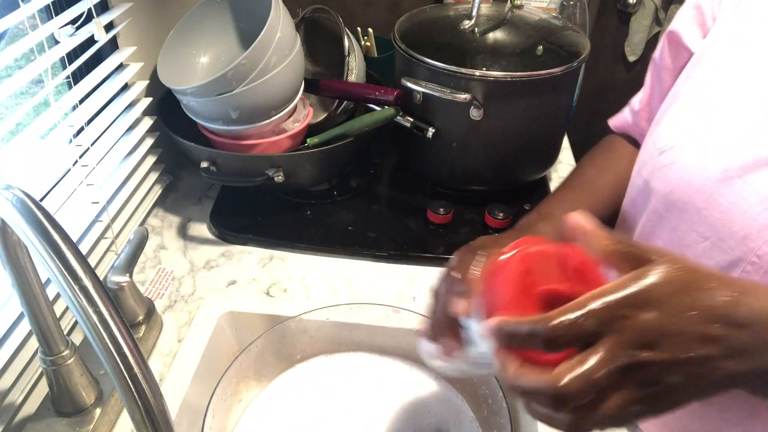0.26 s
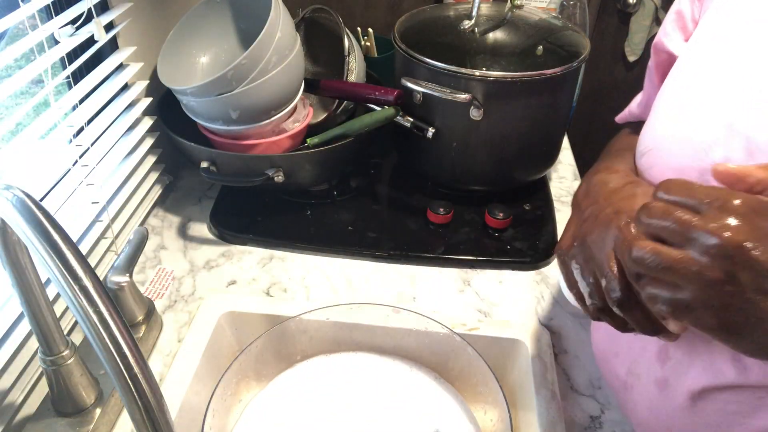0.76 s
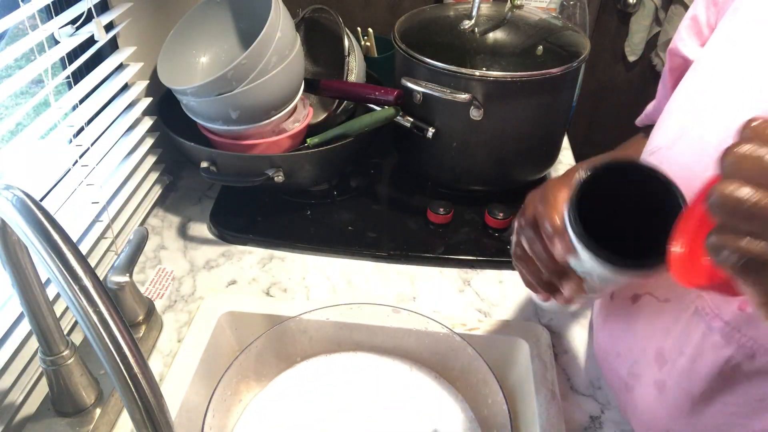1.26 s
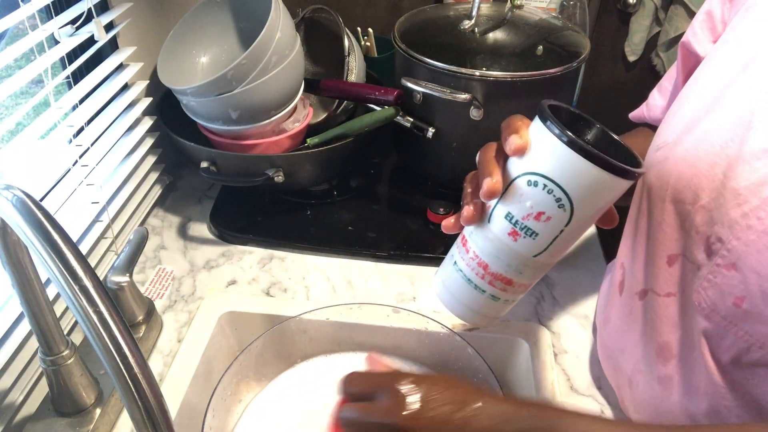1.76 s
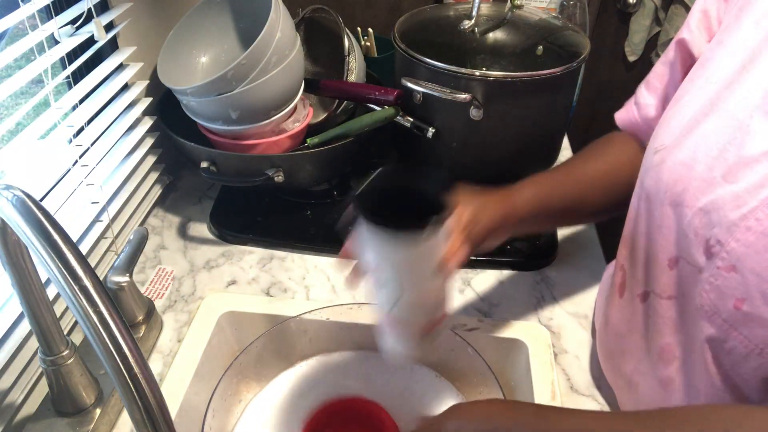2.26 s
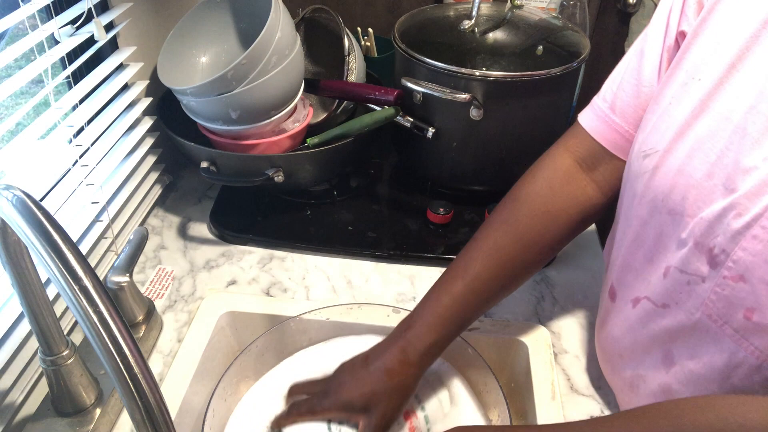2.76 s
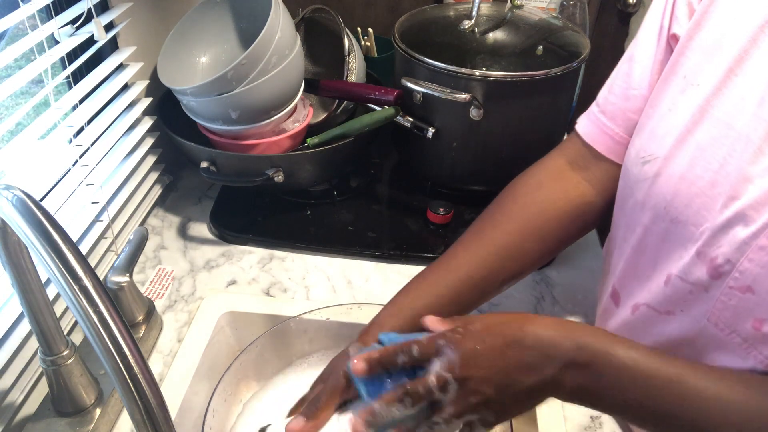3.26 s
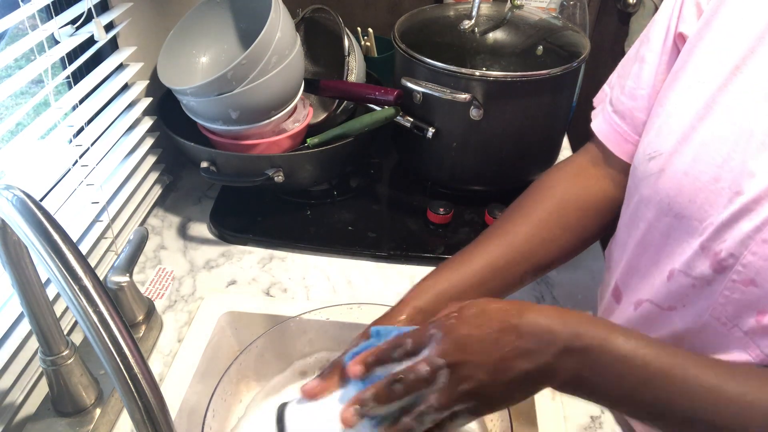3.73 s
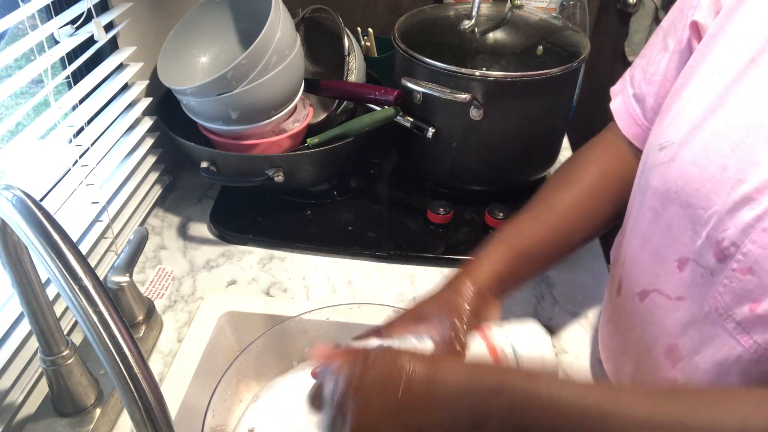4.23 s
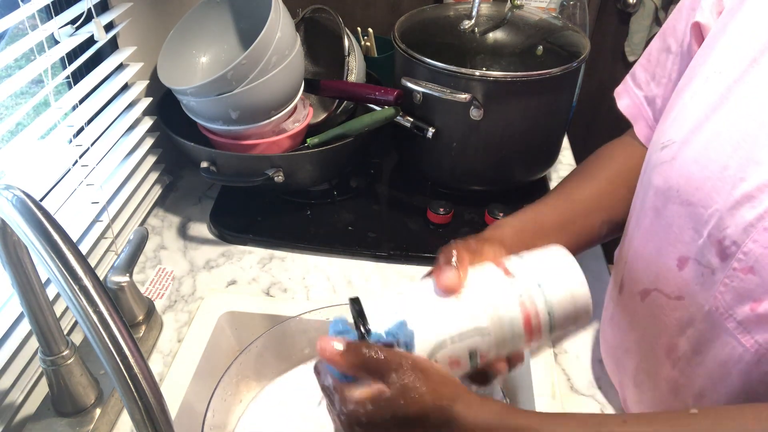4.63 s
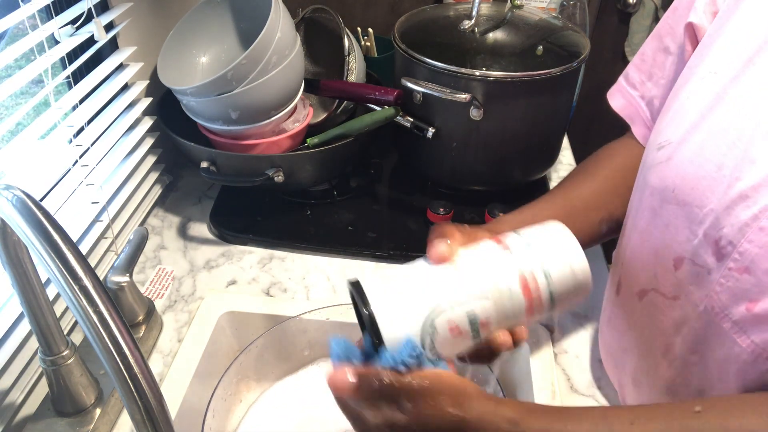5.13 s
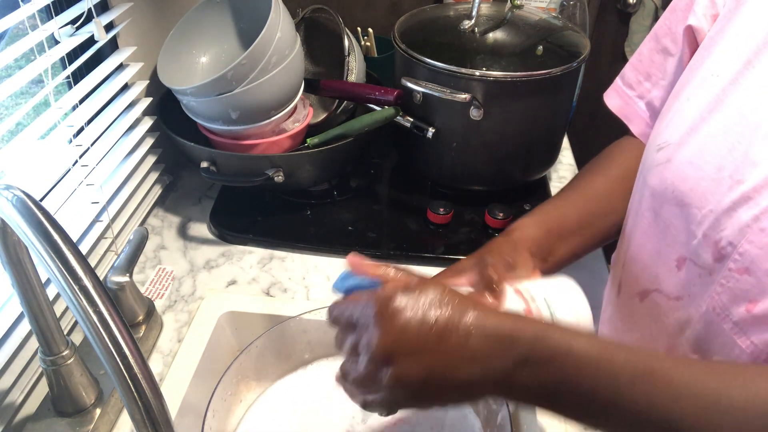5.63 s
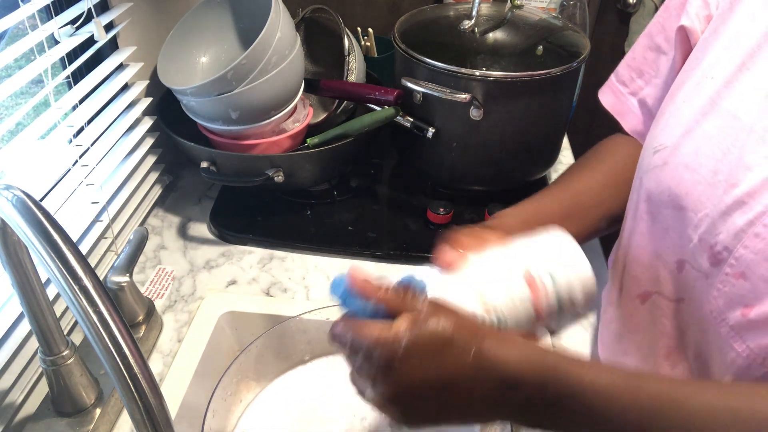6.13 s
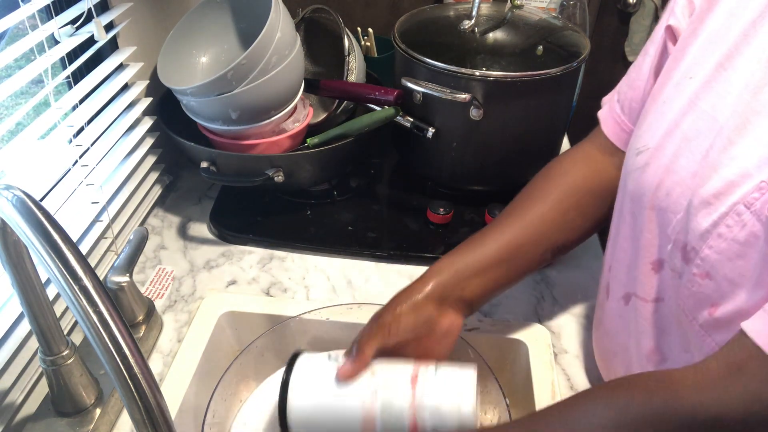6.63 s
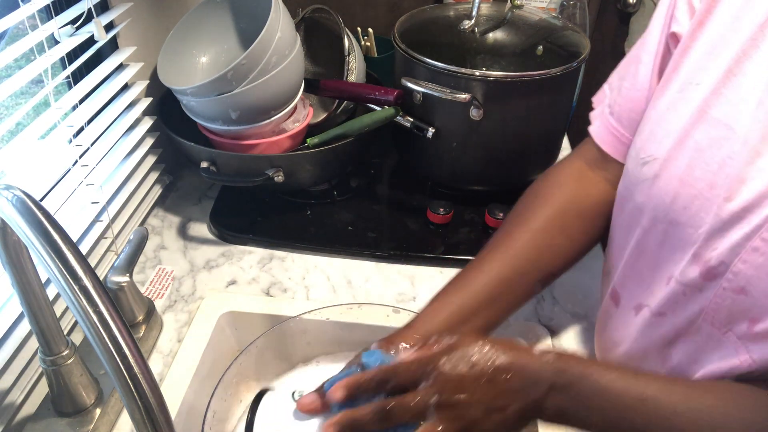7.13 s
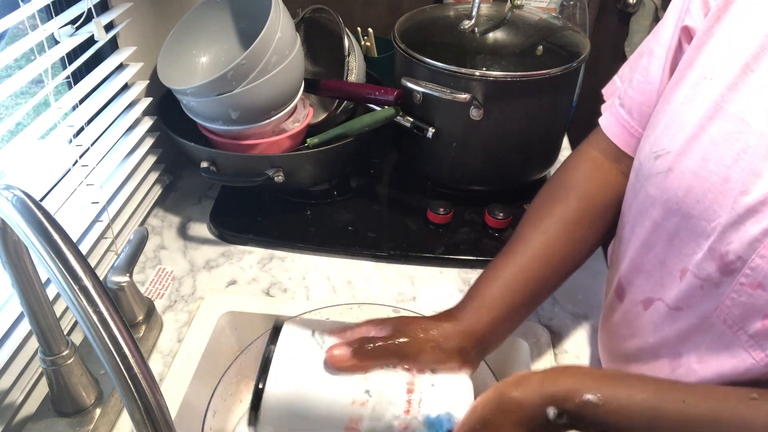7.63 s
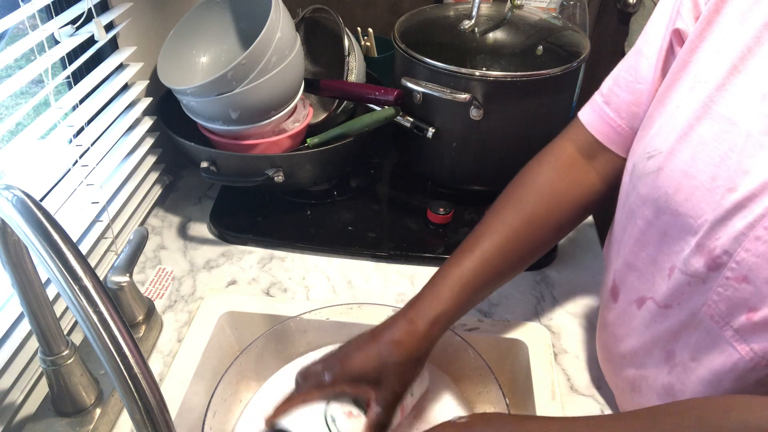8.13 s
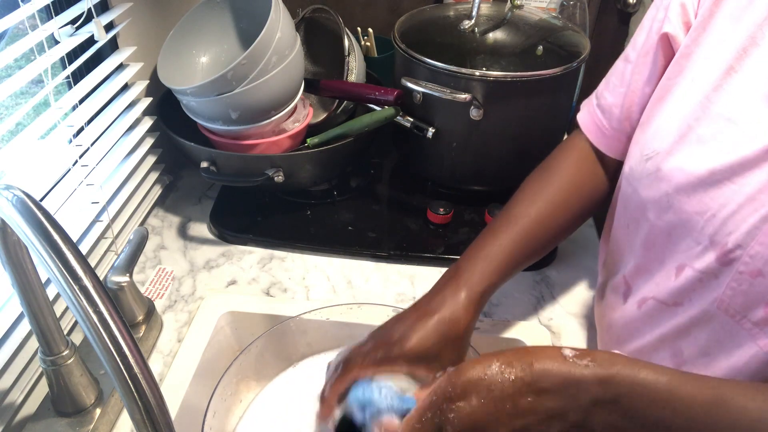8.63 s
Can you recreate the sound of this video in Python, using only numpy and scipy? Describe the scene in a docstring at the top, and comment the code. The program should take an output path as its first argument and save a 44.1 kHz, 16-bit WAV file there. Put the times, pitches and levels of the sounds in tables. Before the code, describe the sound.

A lid pops off a plastic tumbler, then hollow knocks and wet sponge squelches come from a sink over a steady appliance hum.

```python
"""A plastic tumbler washed by hand in a bowl of suds in a sink, close to a phone in a small kitchen.
Its lid pops off and sets the air inside ringing. It knocks and rolls against the bowl, the basin booms
underneath, and a sponge squelches among wet clacks and one squeak. Behind it an appliance hums and
blows throughout, a drone stops early on, and the microphone circuit picks up a faint, regular tick."""
import sys
import numpy as np
from scipy import signal
from scipy.fft import rfft, irfft
from scipy.io import wavfile
from scipy.ndimage import uniform_filter1d

SR = 44100
rng = np.random.default_rng(int(sys.argv[2]) if len(sys.argv) > 2 else 0)


def transcribe(signal):
    """Save signal, clipped to [-1, 1], as a 16-bit WAV file at the path in sys.argv[1]."""
    frames = np.atleast_2d(signal).T
    limited = np.clip(frames, -1, 1)
    pcm = np.round(limited * 32767).astype(np.int16)
    wavfile.write(sys.argv[1], SR, pcm)


N = 392038
T = np.arange(N) / SR


def amp(db):
    """Gain of a level in dB."""
    return 10 ** (np.asarray(db) / 20)


def unit(x):
    """Scaled to rms 1."""
    return x / np.sqrt(np.mean(x ** 2))


def band(x, hz, width_hz):
    """Resonant band-pass, gain 1 at the centre."""
    return signal.lfilter(*signal.iirpeak(min(hz, .45 * SR), hz / width_hz, fs=SR), x)


def wander(rate_hz):
    """Smooth random drift with a spread near 1."""
    hold = int(SR / rate_hz)
    steps = np.repeat(rng.standard_normal(N // hold + 1), hold)
    return 1.4 * uniform_filter1d(uniform_filter1d(steps, hold), hold)[:N]


def coloured_noise(points):
    """Noise of rms 1 whose spectrum follows (freq_hz, level_db) points."""
    hz, db = np.transpose(points)
    bins_hz = np.maximum(np.arange(N // 2 + 1) * SR / N, 1)
    gain = amp(np.interp(np.log(bins_hz), np.log(hz), db))
    return unit(irfft(rfft(rng.standard_normal(N)) * gain, N))


def decay(t, t60_s, rise_s):
    """Envelope that rises quickly and falls 60 dB in t60_s."""
    return np.exp(-np.log(1000) * t / t60_s) * (1 - np.exp(-t / rise_s))


def ring(hz, t60_s, rise_s):
    """One damped mode."""
    t = T[:SR // 3]
    return np.sin(2 * np.pi * hz * t) * decay(t, t60_s, rise_s)


def add(out, start_s, x):
    """Mix x into out from start_s."""
    i = int(start_s * SR)
    out[i:i + len(x)] += x[:N - i]


def swell(middle_s, length_s, db):
    """A smooth rise and fall around middle_s."""
    out = np.zeros(N)
    add(out, middle_s - length_s / 2, amp(db) * np.hanning(int(length_s * SR)))
    return out


# Noise floor of the phone's microphone: freq_hz, relative_db
HISS_SPECTRUM = [(2500, -5), (3200, -10.5), (4000, 0), (6300, -3.5), (8000, -6.5), (10000, -10),
                 (13000, -11.5), (16000, -12)]
def microphone_hiss(level_db=-78):
    """The microphone's own steady noise."""
    return amp(level_db) * coloured_noise(HISS_SPECTRUM)


# Colour of the tick, inside the phone: centre_hz, width_hz, peak_db
TICK_BANDS = [(2420, 420, -49), (4170, 1200, -53.5), (5600, 1300, -67.5)]
def electrical_ticks(first_s=.0522, period_s=.10241, offbeat_db=-8.5):
    """The microphone circuit picks up regular spikes of uneven size, with weaker ones halfway between."""
    spikes = np.zeros(N)
    at = (np.arange(first_s, N / SR, period_s / 2) * SR).astype(int)
    spikes[at] = amp(1.6 * rng.standard_normal(len(at)))
    spikes[at[1::2]] *= amp(offbeat_db)
    # a band's peak answer to a spike grows with its width, so divide that out
    return sum(amp(db) * SR / (np.pi * width) * band(band(spikes, hz, width), hz, width)
               for hz, width, db in TICK_BANDS)


def drone(level_db=-52, pitch_hz=456, width_hz=10.5, end_s=.74, fade_s=.03):
    """A narrow band of noise, heard as a wavering tone that stops early on."""
    gate = np.clip((end_s - T) / fade_s, 0, 1)
    return amp(level_db) * gate * unit(band(rng.standard_normal(N), pitch_hz, width_hz))


def bass_dip(boom, knee_db=-36, recovery_s=0.18):
    """Gain of the appliance's bass: it sinks while the basin booms, to half at the knee, then recovers."""
    pole = np.exp(-1 / (recovery_s * SR))
    boom_envelope = signal.lfilter([1 - pole], [1, -pole], np.abs(boom))
    return 1 / (1 + boom_envelope / amp(knee_db))


# Air blown by the appliance in the background: freq_hz, relative_db
AIR_SPECTRUM = [(18, -54.5), (30, -15), (90, -8.5), (101, -9.5), (123, -2), (155, -17.5), (233, -17),
                (324, -13), (363, -36), (400, -16.5), (450, -27.5), (773, -21), (2510, -42.5), (3050, -69),
                (3960, -77.5), (6710, -120)]
# Resonances of its housing: centre_hz, width_hz, level_db
HOUSING_MODES = [(310.4, 56, -57.5), (406.6, 18, -61.5), (533, 69, -56), (786, 63, -56), (1209, 57, -64.5),
                 (2380, 340, -68.5), (3484, 110, -82.5), (4955, 140, -82)]
# Its whine, on multiples of the mains frequency: pitch_hz, level_db
WHINE_TONES = [(4920, -89), (4980, -86), (5040, -93)]
def appliance(bass_gain, air_db=-45, hum_db=-41.5, waver_db=1.0, mains_hz=60):
    """Air rushes through a resonant housing, over magnet hum at twice mains and a thin whine."""
    rush = amp(air_db) * coloured_noise(AIR_SPECTRUM)
    rush += (bass_gain - 1) * band(rush, 120, 300)
    for hz, width_hz, db in HOUSING_MODES:
        gain = amp(db + 1.6 * wander(9))
        resonance = band(rng.standard_normal(N), hz, width_hz)
        rush += gain * unit(band(resonance, hz, 6.2 * width_hz))
    hum_rms = bass_gain * amp(hum_db + waver_db * wander(1.5))
    hum = hum_rms * np.sqrt(2) * np.sin(2 * np.pi * 2 * mains_hz * T)
    whine = sum(amp(db) * np.sqrt(2) * np.sin(2 * np.pi * hz * T) for hz, db in WHINE_TONES)
    return rush + hum + whine


# Wet rubbing at the sink, from lid, hands and sponge: middle_s, length_s, level_db
RUB_STROKES = [(1.187, 0.14, -44.5), (2.988, 3.6, -76.5), (4.1, 1.8, -69.5), (4.807, 0.42, -61),
               (5.453, 1.55, -69), (7.012, 0.79, -73), (7.654, 0.57, -66), (8.197, 0.3, -79),
               (8.853, 0.17, -58)]
def suds(idle_db=-74.5, squish_count=1500):
    """Suds burst in squishes, each a few ms of crackle at its own pitch, louder with every rub."""
    crackle, t = np.zeros(N), T[:SR // 30]
    fizz_bands = [band(rng.standard_normal(N), hz, 300) for hz in np.geomspace(1500, 2800, num=5)]
    for when, pitch, size, length in rng.random((squish_count, 4)):
        i = int(when * (N - len(t)))
        fizz = fizz_bands[int(pitch * len(fizz_bands))][i:i + len(t)]
        fade = np.exp(-t / (.002 + 0.01 * length))
        crackle[i:i + len(t)] += amp(7.3 * size ** 2) * fizz * fade
    rubbing = sum(swell(*stroke) for stroke in RUB_STROKES)
    return (amp(idle_db) + rubbing) * unit(crackle)


# A wet squeak at the sink: start_s, level_db
WET_SQUEAKS = [(8.833, -40)]
def squeak(from_hz=2830, to_hz=2180, glide_s=.004):
    """A short tone that slides down and dies."""
    out, t = np.zeros(N), T[:SR // 10]
    hz = to_hz + (from_hz - to_hz) * np.exp(-t / glide_s)
    chirp = np.sin(2 * np.pi * np.cumsum(hz) / SR) * decay(t, t60_s=0.065, rise_s=0.0041)
    for start_s, db in WET_SQUEAKS:
        add(out, start_s, amp(db) * chirp)
    return out


# Clacks and squelches, close by: start_s, level_db, centre_hz, t60_s, wall_relative_db
WET_CLACKS = [(1.1612, -35, 2250, 0.089, -2.5), (1.1741, -20.5, 2030, 0.04, 3.5),
              (1.1896, -40.5, 2180, 0.02, -1), (1.3364, -46, 2190, 0.039, 2),
              (2.416, -41, 1830, 0.046, -13), (2.54, -33.5, 2400, 0.038, 4.5),
              (2.5609, -38.5, 2450, 0.052, 2), (2.8613, -48.5, 1880, 0.046, -2),
              (2.919, -48, 2420, 0.041, -3), (3.0023, -39.5, 2400, 0.027, -18),
              (3.1602, -47, 2430, 0.029, 3), (4.2707, -32.5, 2590, 0.043, 1.5),
              (4.5484, -47, 1930, 0.14, 0), (4.853, -51.5, 2470, 0.064, 8.5), (5.0797, -43, 1730, 0.038, 8),
              (5.478, -48, 2470, 0.066, -16), (5.789, -54, 2400, 0.072, -10), (6.4735, -49, 2120, 0.05, 8),
              (6.553, -42.5, 2310, 0.026, -12), (6.643, -44, 2230, 0.025, 8.5),
              (6.7282, -46.5, 1910, 0.064, -5), (6.975, -49, 2300, 0.051, -11),
              (7.649, -55, 1920, 0.05, -4), (8.0075, -50.5, 1900, 0.051, 1),
              (8.095, -32.5, 2240, 0.095, -5.5)]
def wet_clacks():
    """A sharp crack breaks into a grainy, fading splash, over the hollow wall of the tumbler."""
    out, t = np.zeros(N), T[:SR // 5]
    grain_samples = 40
    for start_s, db, hz, t60_s, wall_db in WET_CLACKS:
        noise = rng.standard_normal(len(t))
        grain_db = 3.1 * rng.standard_normal(len(t) // grain_samples + 1)
        grains = noise * amp(grain_db).repeat(grain_samples)[:len(t)]
        crack = unit(band(band(grains, hz, .5 * hz), hz, .25 * hz))
        wall = amp(wall_db) * unit(band(band(grains, 1000, 600), 1200, 800))
        add(out, start_s, amp(db) * (crack + wall) * decay(t, t60_s, rise_s=0.00044))
    return out


# The sink basin, under the bowl: start_s, level_db, pitch_hz
BASIN_BOOMS = [(2.442, -26.5, 79), (2.564, -16, 81.5), (2.757, -22, 79), (2.801, -19, 87), (2.853, -21, 83),
               (2.894, -24.5, 78), (3.05, -29, 79.5), (3.174, -27, 84), (4.284, -7.5, 101.4),
               (4.343, -18, 102), (4.426, -21, 85.3), (5.1, -26, 86), (6.519, -23, 81.5), (6.651, -26, 74),
               (6.71, -27.5, 90), (8.017, -22.5, 104), (8.119, -20.5, 68.6), (8.192, -22, 87.7),
               (8.485, -27, 106)]
def basin_booms():
    """One low mode of the basin; its pitch shifts from boom to boom with the load on it."""
    out = np.zeros(N)
    for start_s, db, hz in BASIN_BOOMS:
        add(out, start_s, amp(db) * ring(hz, t60_s=0.16, rise_s=0.0058))
    return out


# The bowl in the sink, rung by both rolls and knocks: pitch_hz, knock_gain_db, t60_s
BOWL_MODES = [(233, -3, 0.083), (307, 3.5, 0.076), (413.6, -4, 0.1), (595, 4, 0.036), (751, -4.5, 0.062),
              (1176, -24, 0.067)]
# The tumbler rolling along the bowl wall: middle_s, length_s, level_db, centre_hz
TUMBLER_ROLLS = [(2.444, 0.12, -43, 523), (2.534, 0.086, -44.5, 315), (2.807, 0.083, -38, 315),
                 (2.887, 0.088, -51, 340), (3.053, 0.05, -40.5, 336), (4.25, 0.15, -45.5, 615),
                 (4.34, .1, -44, 370), (4.409, 0.089, -37, 446), (4.484, 0.049, -38, 388),
                 (6.473, 0.057, -51.5, 410), (6.56, 0.069, -43, 336), (6.63, .06, -52, 400),
                 (6.678, .07, -48, 315), (6.762, .07, -51, 510), (8.15, 0.052, -39.5, 331),
                 (8.217, 0.12, -49, 735)]
def tumbler_rolls(falloff_db_per_octave=17.7):
    """Many small bumps keep the bowl ringing; modes near a roll's centre pitch sound most."""
    out = np.zeros(N)
    for hz, _, t60_s in BOWL_MODES:
        bumps = rng.standard_normal(N) * amp(3.5 * wander(60))
        gain = sum(swell(middle_s, length_s, db - falloff_db_per_octave * abs(np.log2(hz / centre_hz)))
                   for middle_s, length_s, db, centre_hz in TUMBLER_ROLLS)
        out += gain * unit(band(bumps, hz, width_hz=2.76 / t60_s))
    return out


# Tumbler against bowl, near the phone: start_s, level_db, tilt_db_per_octave, wall_fraction, contact_s
TUMBLER_KNOCKS = [(2.542, -27, 7, 0.28, 0.0037), (2.551, -33, -14, 0.05, 0.0036),
                  (2.565, -33, 6, 0.26, 0.0033), (2.751, -27.5, -3, 0.06, 0.002),
                  (2.788, -23.5, -9, 0.2, 0.0028), (2.829, -36, 0, 0.2, 0.0024),
                  (3.042, -36, -7, 0.4, 0.0036), (3.166, -15, -3, 0.2, 0.0015),
                  (4.279, -11, -6.5, 0.37, 0.0019), (4.30, -17, 0, 0.45, 0.0024),
                  (4.366, -26, 4, 0.2, 0.0031), (6.457, -43, 0, 0.15, 0.0033),
                  (6.648, -27, -2.5, 0.18, 0.0023), (6.71, -40, 5.5, 0.51, .002),
                  (8.101, -27.5, 2, 0.24, 0.0005), (8.119, -24.5, -6, 0.31, 0.0011),
                  (8.478, -24, 0.5, .22, 0.0041)]
def tumbler_knocks(detune_spread=0.013, pivot_hz=315, lead_s=.002):
    """Each blow rings the bowl's modes, weighted by where it lands; they swell over the contact time."""
    out = np.zeros(N)
    for start_s, db, tilt, wall_fraction, contact_s in TUMBLER_KNOCKS:
        for order, (hz, mode_db, t60_s) in enumerate(BOWL_MODES, start=1):
            detune = 1 + detune_spread * rng.standard_normal()
            gain = amp(db + mode_db + tilt * np.log2(hz / pivot_hz))
            mode_shape = np.sin(np.pi * wall_fraction * order)
            add(out, start_s - lead_s, gain * mode_shape * ring(hz * detune, t60_s, contact_s))
    return out


# The tumbler's rim: pitch_hz, level_db, t60_s
RIM_MODES = [(1680, -23.5, 0.021), (2270, -25.5, 0.021), (2890, -32, 0.025), (4410, -51.5, 0.03),
             (6300, -56, .025), (8150, -51, 0.015)]
# The lid letting go, close to the phone: start_s
RIM_SNAPS = [1.1755, 1.1805]
def rim_snap():
    """The rim clicks brightly as the lid snaps free."""
    out = np.zeros(N)
    click = sum(amp(db) * ring(hz, t60_s, rise_s=0.00036) for hz, db, t60_s in RIM_MODES)
    for start_s in RIM_SNAPS:
        add(out, start_s, click)
    return out


# The air column inside the tumbler: pitch_hz, relative_db, t60_s
TUMBLER_AIR_MODES = [(521, 0, .16), (408, -6, .06), (350, -12, .055)]
# The lid pulled off, close to the phone: start_s, level_db, t60_fraction, rise_s
LID_TUGS = [(1.1766, -5.5, 0.14, 0.0016), (1.1844, -4.5, 0.95, 0.0064)]
def lid_pop():
    """Each tug sets the air in the tumbler ringing; the first is choked by the lid still in place."""
    out = np.zeros(N)
    for start_s, db, t60_fraction, rise_s in LID_TUGS:
        pop = sum(amp(mode_db) * ring(hz, t60_fraction * t60_s, rise_s)
                  for hz, mode_db, t60_s in TUMBLER_AIR_MODES)
        add(out, start_s, amp(db) * pop)
    return out


def kitchen(x, tail_db=-10.5, t60_s=0.14, delay_s=.004):
    """Hard walls close by add a short diffuse tail."""
    t = T[:SR // 2]
    tail = rng.standard_normal(len(t)) * np.exp(-np.log(1000) * t / t60_s) * (t > delay_s)
    return x + amp(tail_db) * signal.fftconvolve(x, tail / np.linalg.norm(tail))[:N]


def covered_port(x, cutoff_hz=2880, leak_db=-32):
    """The covered microphone port muffles the treble; a little leaks past."""
    lowpass = signal.butter(8, cutoff_hz, fs=SR, output="sos")
    return signal.sosfilt(lowpass, x) + amp(leak_db) * x


def scene():
    """Muffled washing and the bright rim snap in front, the appliance and faint noises behind; mono."""
    boom = basin_booms()
    washing = lid_pop() + tumbler_knocks() + tumbler_rolls() + wet_clacks() + suds() + squeak()
    foreground = covered_port(kitchen(washing) + boom) + kitchen(rim_snap())
    background = appliance(bass_dip(boom)) + drone() + electrical_ticks() + microphone_hiss()
    return (foreground + background)[None]


def record(dry):
    """The phone trims the bass below 44 Hz and cuts the top above 15.74 kHz."""
    highpass = signal.butter(4, 44, "high", fs=SR, output="sos")
    lowpass = signal.ellip(10, .2, 80, 15740, fs=SR, output="sos")
    return signal.sosfilt(lowpass, signal.sosfilt(highpass, dry))


dry = scene()
out = record(dry)
transcribe(out)
```